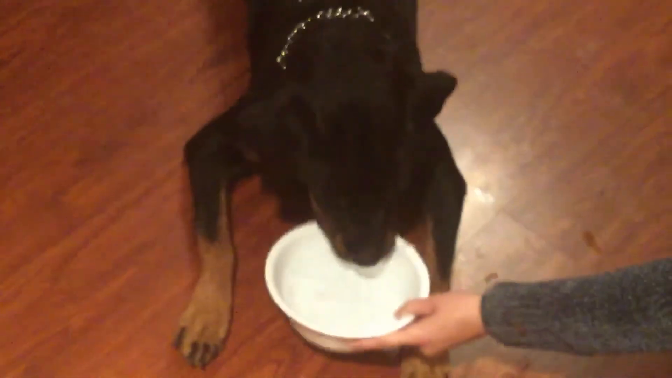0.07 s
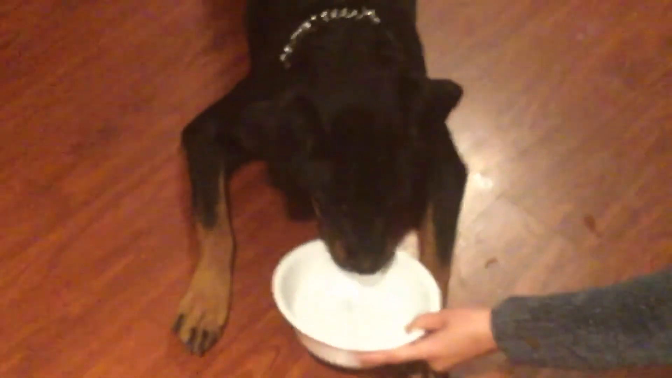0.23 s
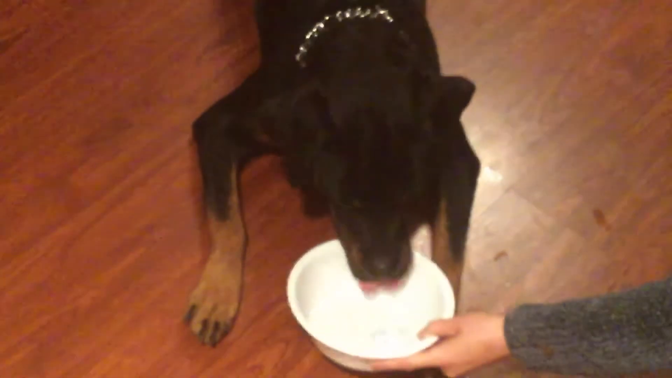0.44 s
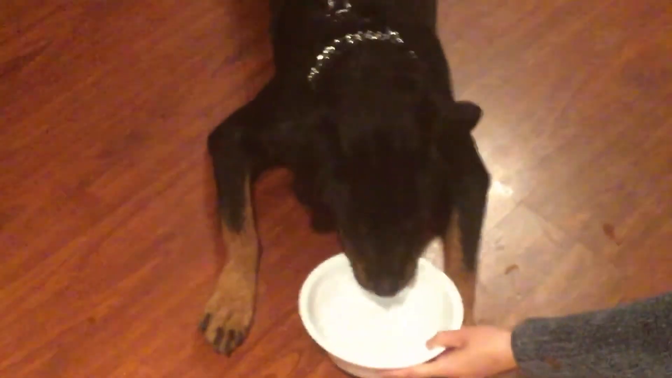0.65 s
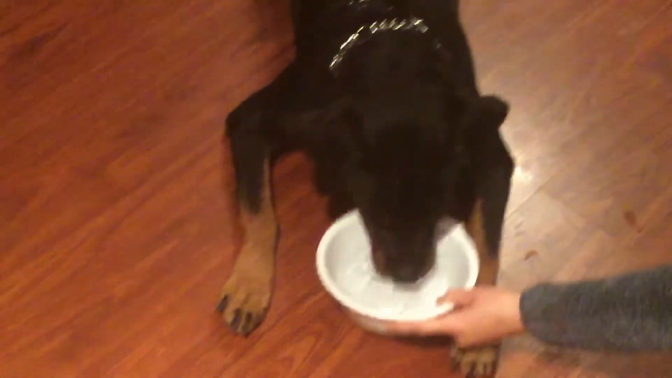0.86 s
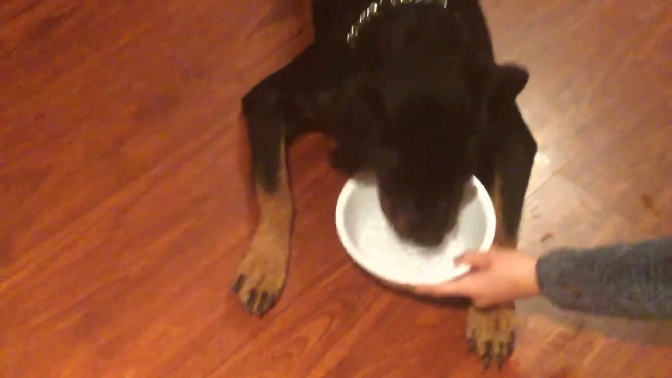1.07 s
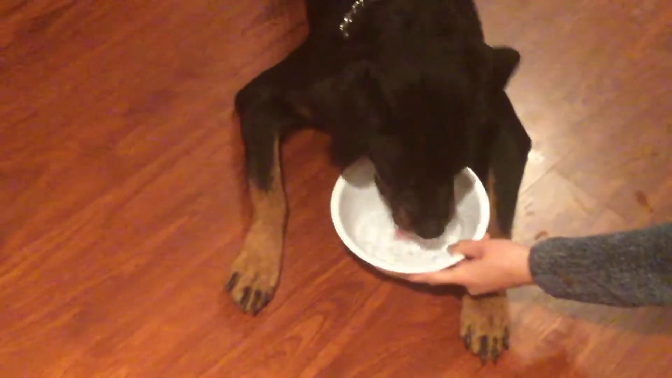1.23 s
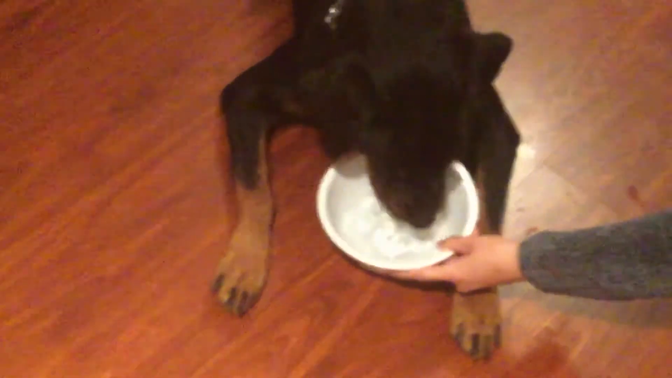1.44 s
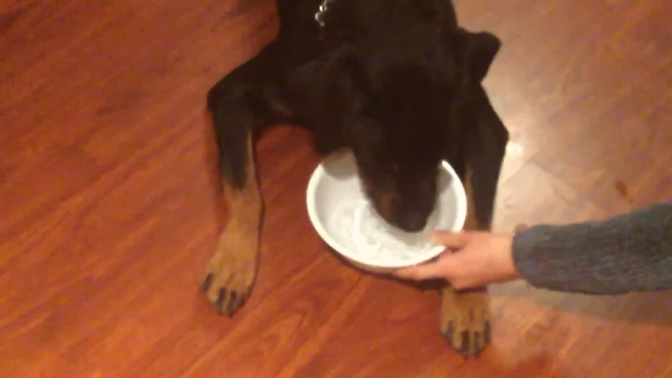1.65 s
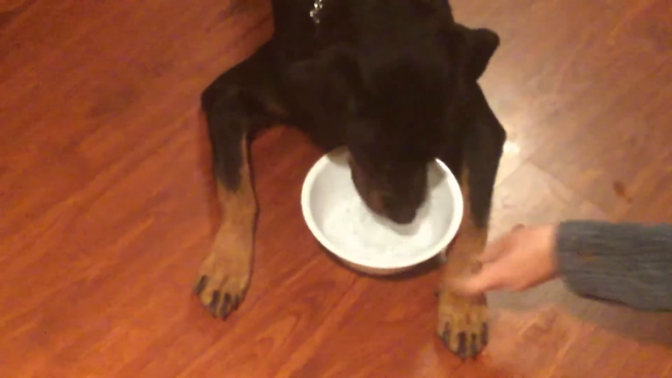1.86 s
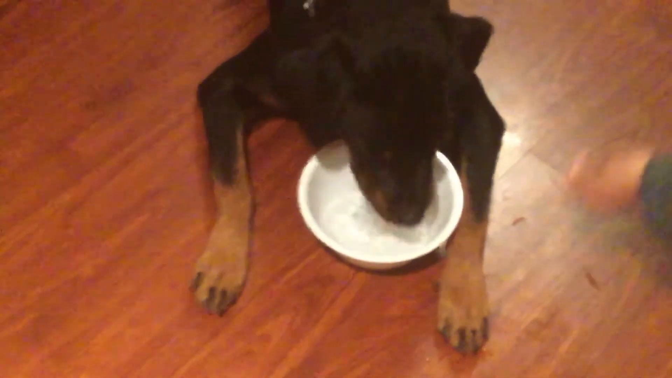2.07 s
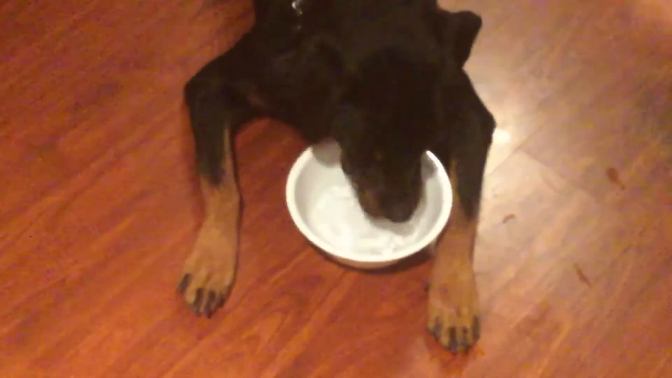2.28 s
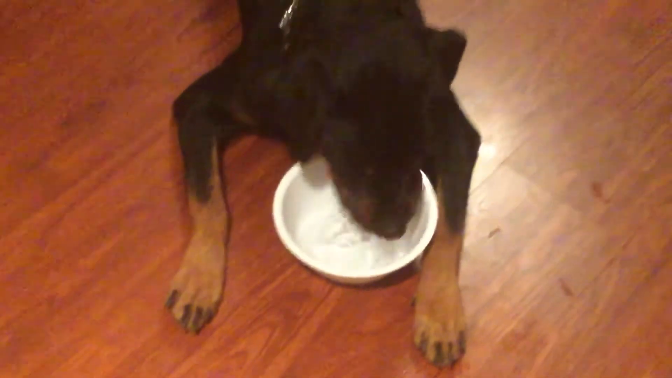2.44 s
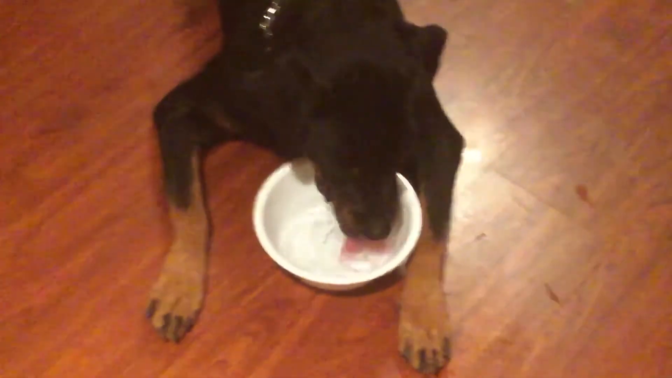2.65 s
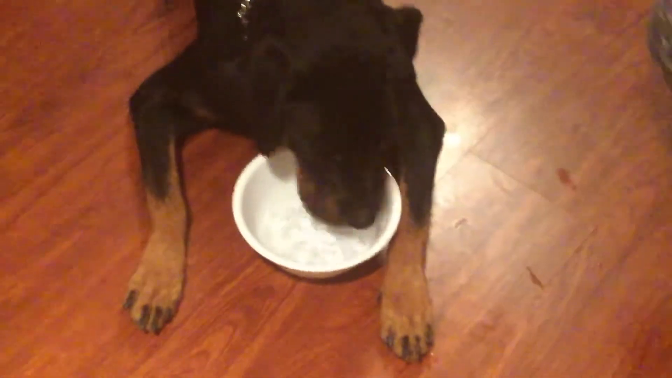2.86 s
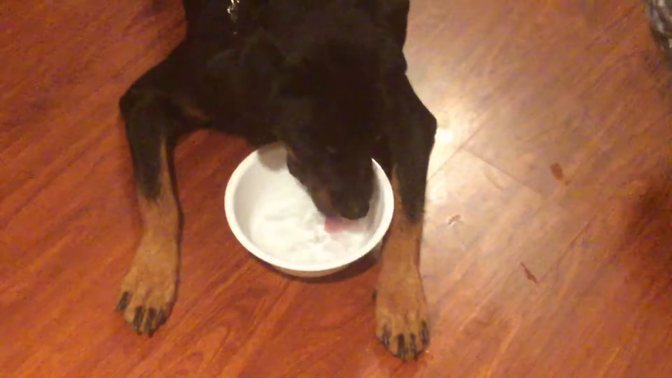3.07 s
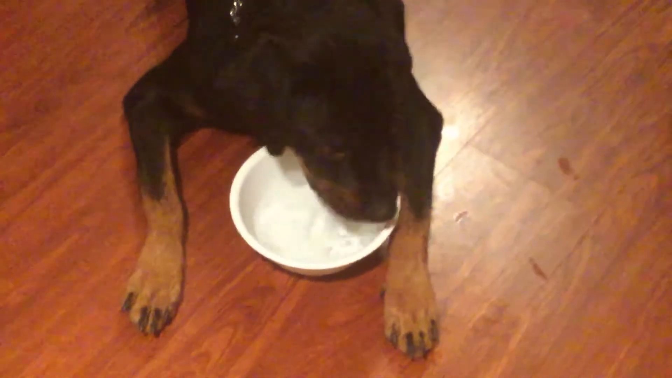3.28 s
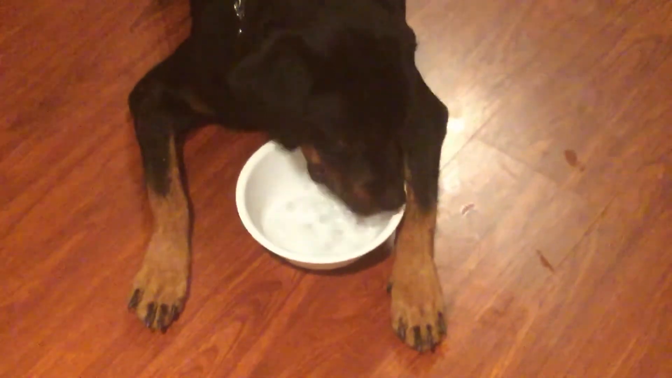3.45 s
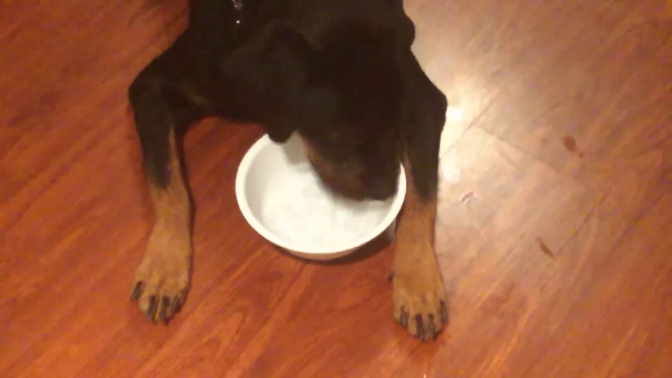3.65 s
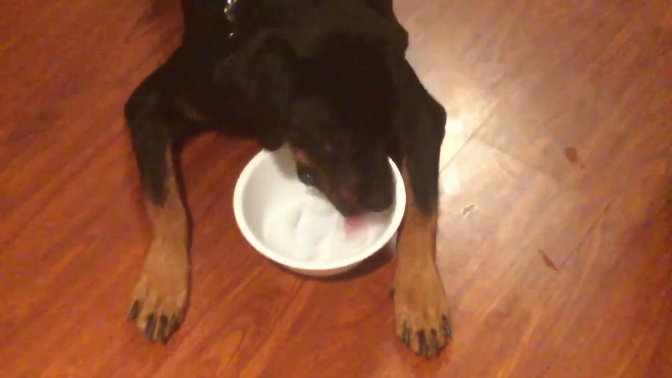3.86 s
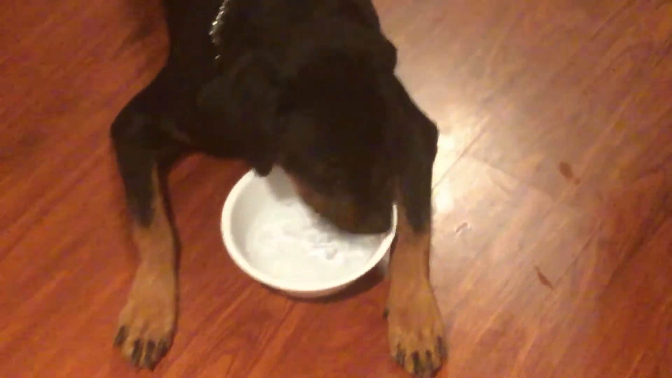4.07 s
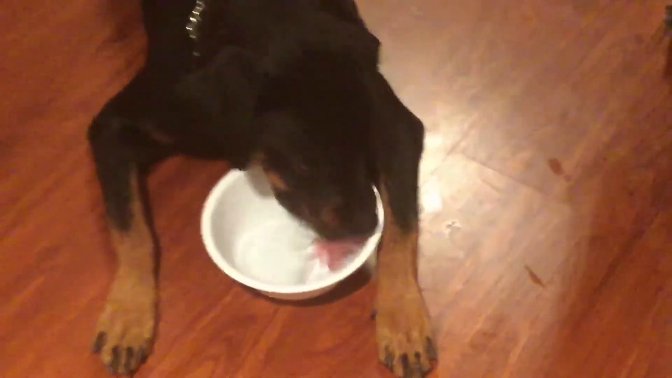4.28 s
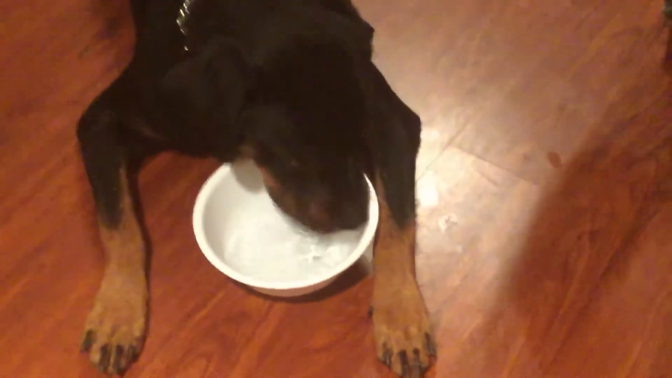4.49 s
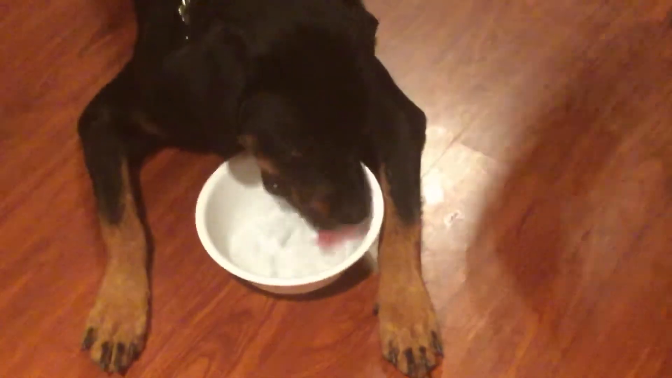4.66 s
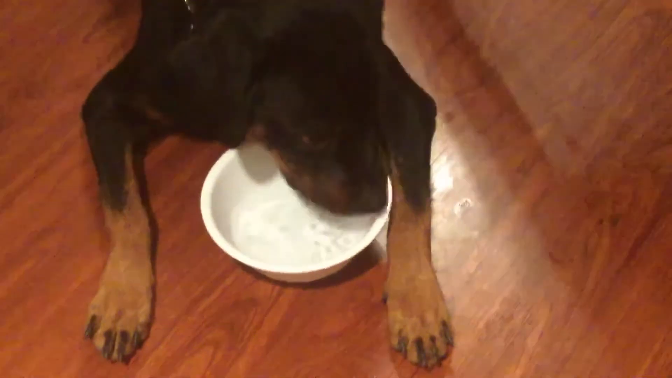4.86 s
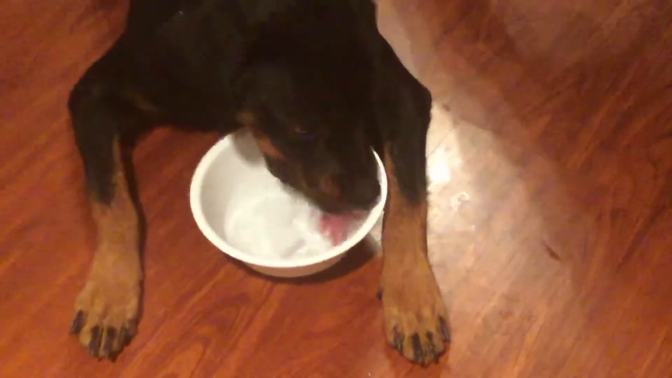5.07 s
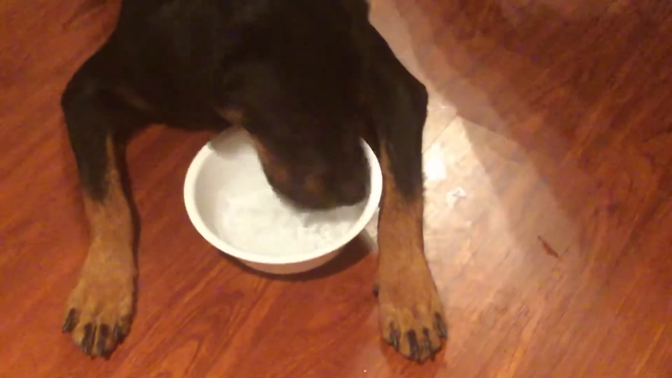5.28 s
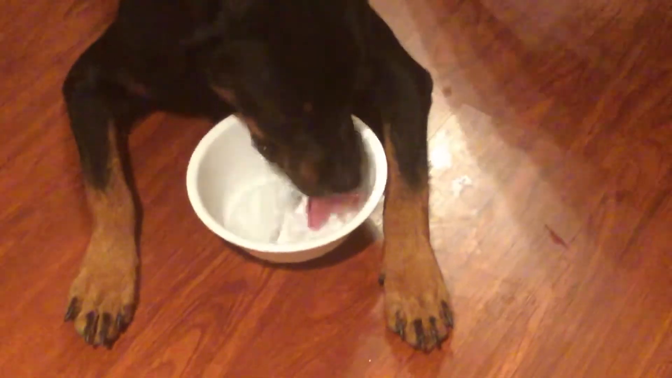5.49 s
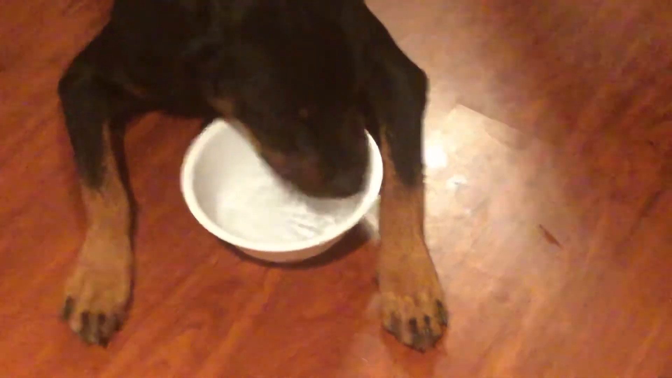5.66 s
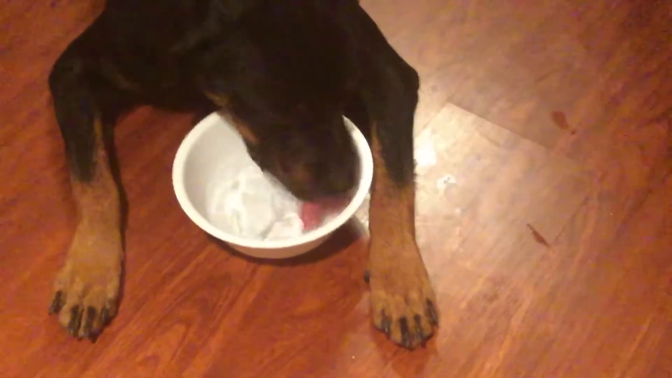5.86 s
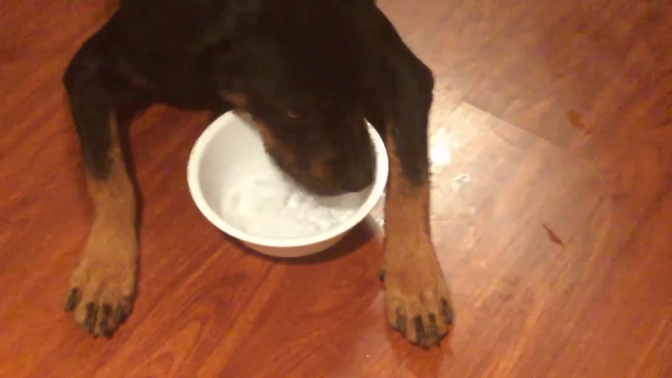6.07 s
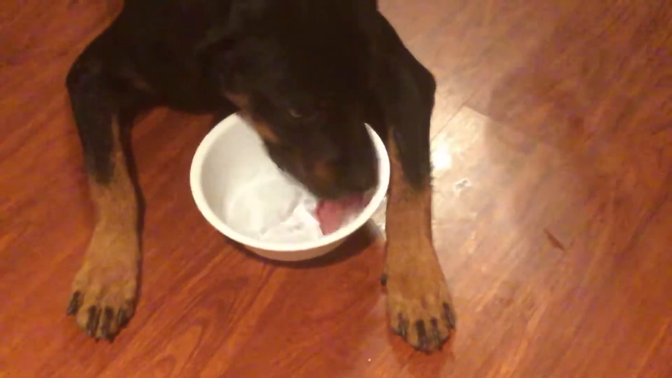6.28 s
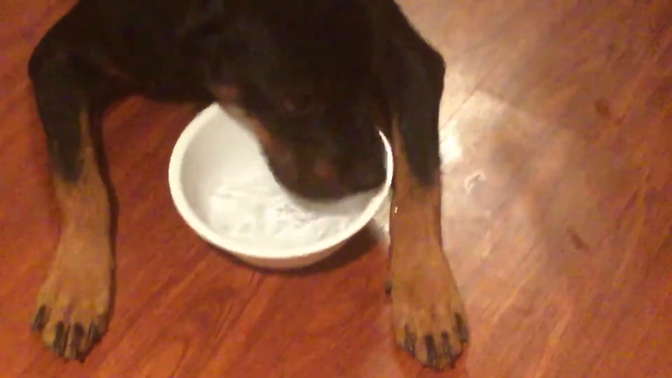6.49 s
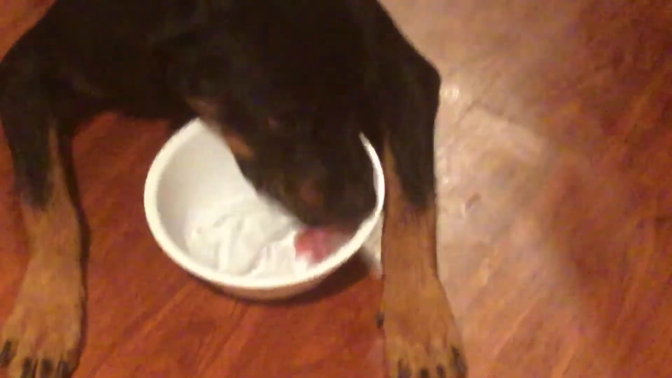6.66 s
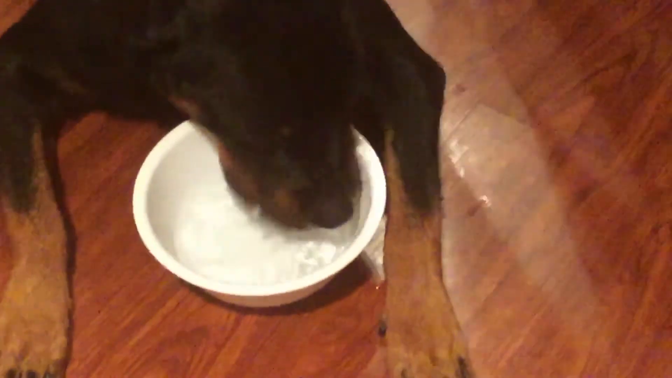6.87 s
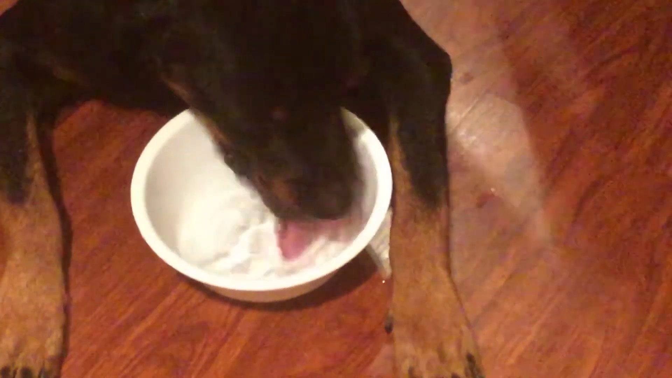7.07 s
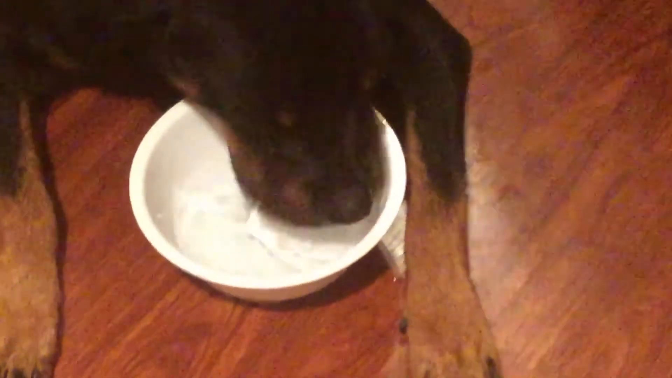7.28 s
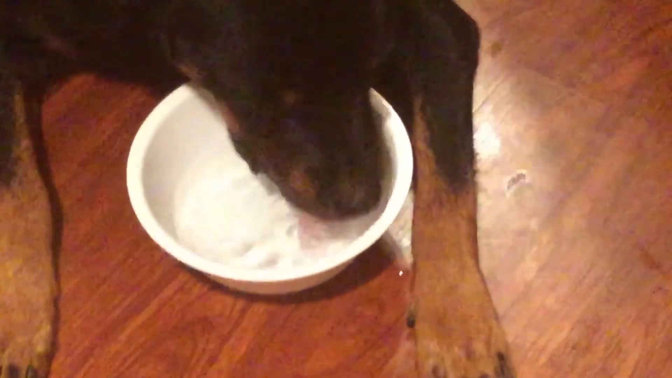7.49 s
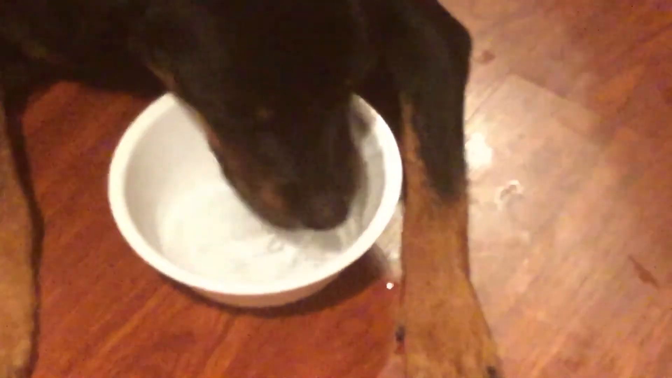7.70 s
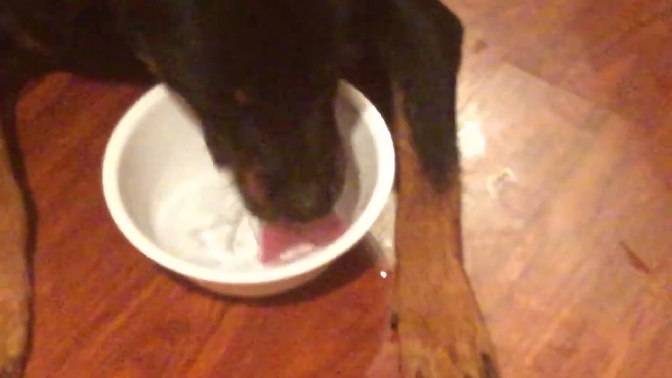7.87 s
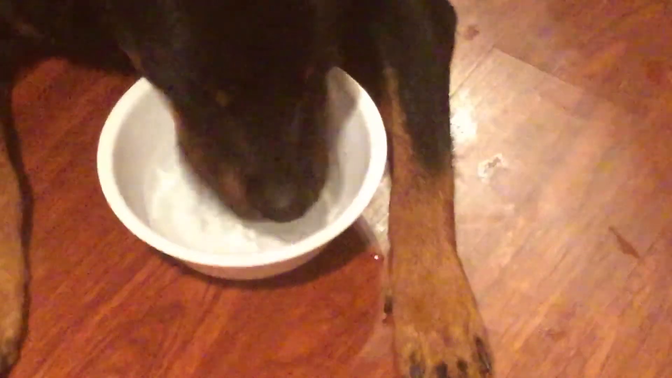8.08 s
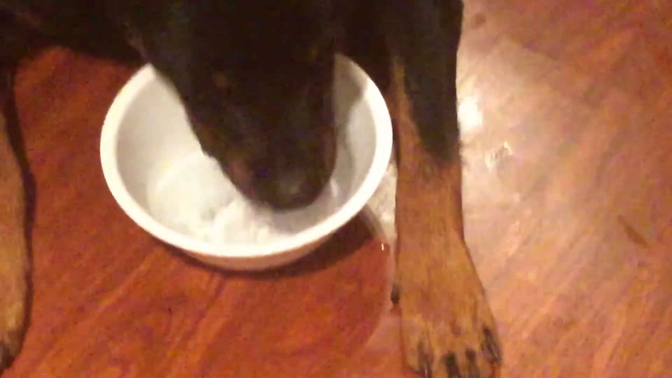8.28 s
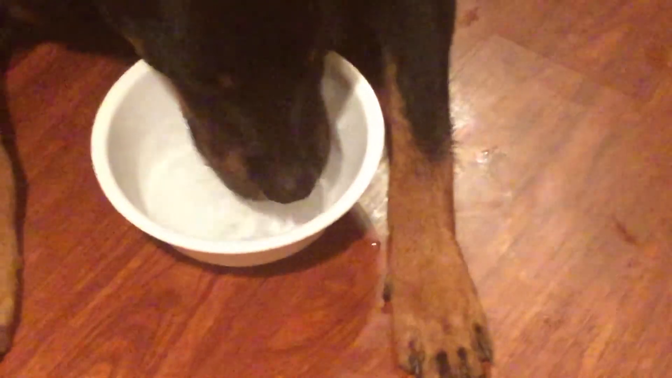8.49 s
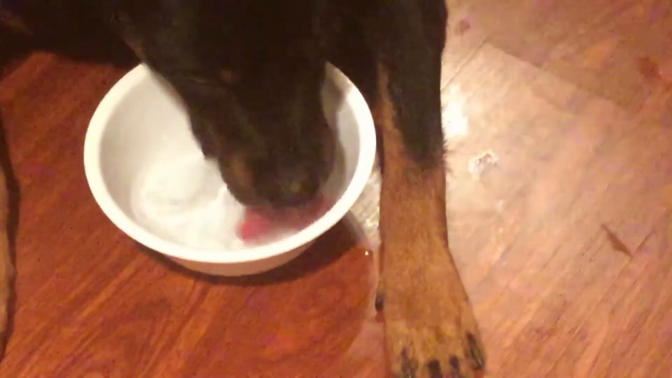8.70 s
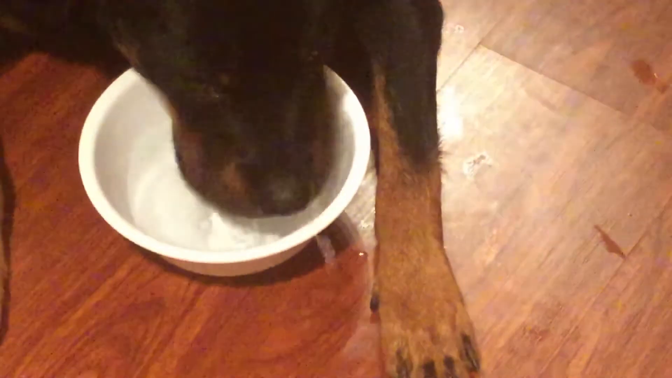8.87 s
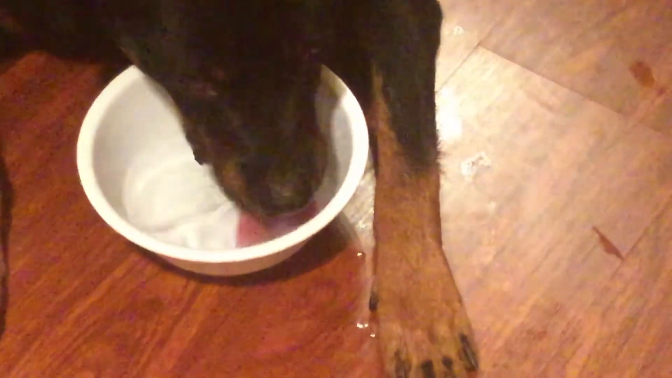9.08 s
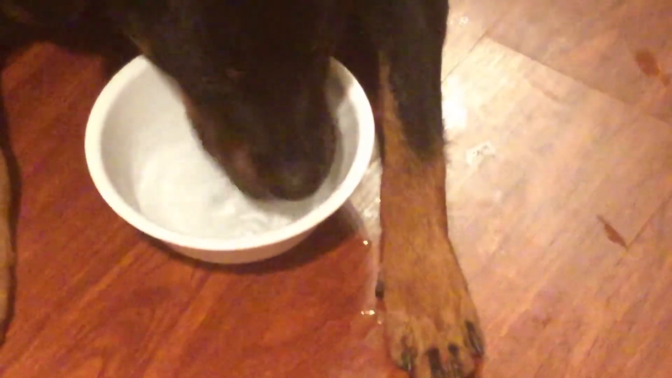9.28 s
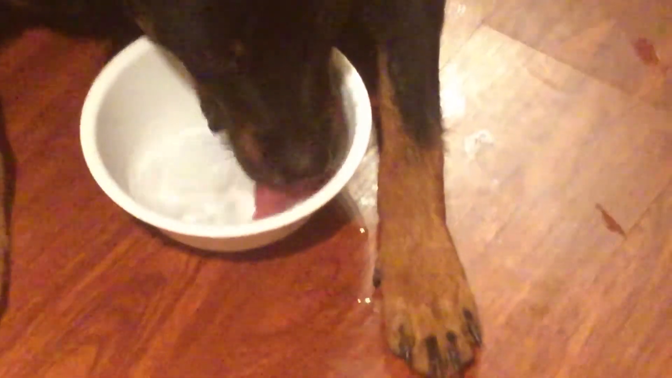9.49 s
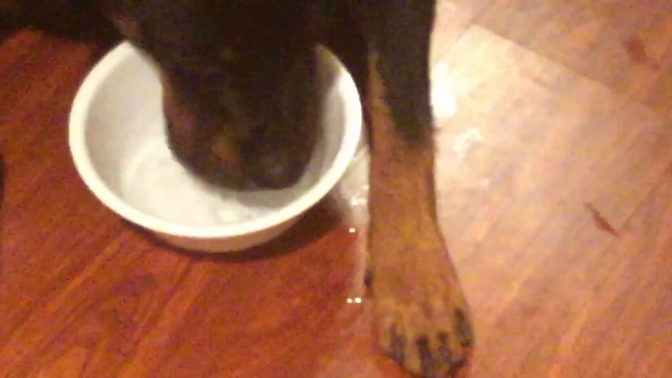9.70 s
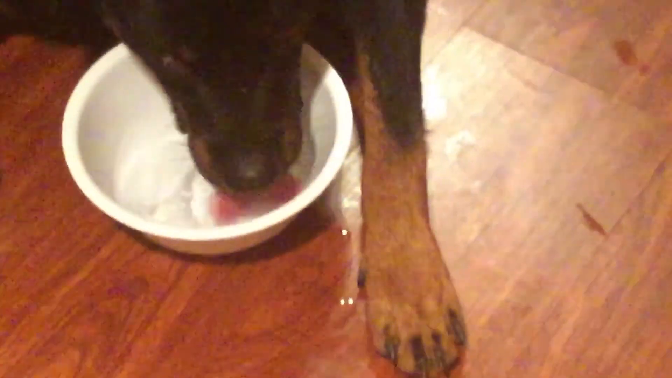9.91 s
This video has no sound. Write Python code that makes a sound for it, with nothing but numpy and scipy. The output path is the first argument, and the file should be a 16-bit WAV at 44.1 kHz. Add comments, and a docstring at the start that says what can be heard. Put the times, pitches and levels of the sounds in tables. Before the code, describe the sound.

Two hollow bowl knocks on floorboards, then a dog's quick, rhythmic wet licking and gulping, with a single brief jingle of a chain collar.

```python
"""In a small live room with a wooden floor, a dog close by laps from a bowl, about two and a half licks a second.
The bowl is set down with two knocks, rim and boards ringing; once the chain collar slips and jingles.
In each lick the tongue slaps in and stirs up slosh and spray; the jaws close with a smack and a gulp.
Water is made of swelling bubbles and coloured noise, rung by the hollow of the bowl and answered by the walls.
A faint mains hum, a low drone and room rumble lie underneath."""
import sys
import numpy as np
from scipy import signal
from scipy.fft import rfft, irfft, next_fast_len
from scipy.io import wavfile
from scipy.ndimage import map_coordinates

SR = 44100
rng = np.random.default_rng(int(sys.argv[2]) if len(sys.argv) > 2 else 0)


def unload_audio(sound):
    """Save the sound as a 16-bit wav file, at the path given as the first command line argument."""
    columns = np.transpose(np.atleast_2d(sound))
    # keep every value between -1 and 1, then stretch to whole-number steps
    steps = np.round(np.clip(columns, -1, 1) * 32767)
    wavfile.write(sys.argv[1], SR, steps.astype(np.int16))


N = 438354

# levels in the tables are mixing levels, ahead of the trims in the functions and of the microphone
# tone of sloshing water: freq_hz, level_db
SLOSH_TONE = [(200, -62.5), (350, -9.5), (520, -0.5), (800, -2), (1600, 5.5), (3000, -4.5), (5000, -7.5),
              (9000, -19)]
# the bowl meets the floor: start_s, thud_db, clack_db (of the rim)
FLOOR_KNOCKS = [(.663, -19, -19), (0.696, -25, -36), (.74, -39.5, -38), (0.788, -39, -43), (.822, -44, -62),
                (1.277, -19, -19), (1.313, -22, -61), (1.346, -61, -63), (1.49, -31, -44.5)]
# one lick each: dip_s (tongue dips), close_s (jaws close), slap_hz, slosh_db, spray_db,
# slap_db (of the dip), smack_db (of the jaws), pocket_hz (air pocket in the jaws), gulp_db
LICKS = [(.41, 0.491, 860, -62.5, -87, -66, -45.5, 773, -67),
         (0.92, 1.081, 1940, -64, -70.5, -43.5, -39.5, 1435, -59),
         (1.377, 1.499, 1200, -67, -89, -52, -64, 1410, -60),
         (1.628, 1.752, 3150, -65, -66, -41.5, -38.5, 890, -47),
         (2.006, 2.188, 706, -62.5, -66.5, -45.5, -35, 2315, -45.5),
         (2.351, 2.495, 1320, -59.5, -63, -45, -27.5, 1145, -47),
         (2.647, 2.828, 1320, -62, -65, -42, -41, 883, -49),
         (3.124, 3.324, 1130, -55.5, -68, -48.5, -38, 826, -47),
         (3.517, 3.655, 2150, -55.5, -68, -44, -37, 1450, -43.5),
         (3.923, 4.104, 690, -53.5, -63, -40, -33.5, 1240, -47),
         (4.313, 4.46, 1460, -51, -62.5, -31.5, -40, 1630, -46),
         (4.672, 4.876, 1294, -60, -67.5, -44.5, -41.5, 2420, -38.5),
         (5.088, 5.258, 1450, -57.5, -69, -53, -27.5, 1250, -42),
         (5.534, 5.699, 1050, -59, -67.5, -53, -34, 2850, -49),
         (5.89, 6.025, 1090, -62.5, -65, -41, -39, 813, -35.5),
         (6.323, 6.48, 1240, -56, -68, -41, -40.5, 1240, -62),
         (6.68, 6.829, 980, -64, -64, -41, -36.5, 1430, -42),
         (7.118, 7.272, 1420, -64, -67, -44, -33, 2500, -48),
         (7.458, 7.608, 1430, -60.5, -62.5, -39.5, -30, 1084, -37),
         (7.866, 8.053, 734, -54, -68.5, -39.5, -40.5, 1570, -45),
         (8.245, 8.392, 1510, -62.5, -69.5, -47, -35.5, 870, -40),
         (8.625, 8.858, 1270, -62.5, -69.5, -51, -47.5, 2160, -49.5),
         (9.031, 9.223, 1170, -60, -67.5, -52.5, -36.5, 793, -38.5),
         (9.516, 9.693, 1190, -64, -68.5, -63, -45.5, 880, -44)]

TOP_HZ = 15200  # upper limit of the microphone's band
GLIDE = .004  # share by which a bubble's pitch rises per swell time
GULP_HZ = 347.5
PEEL_SAMPLES = SR // 40  # wet surfaces part for this long before they let go


def amp(db):
    """Decibels to gain."""
    return 10 ** (np.asarray(db) / 20)


def unit(x):
    """Scaled to rms 1."""
    return x / np.sqrt(np.mean(x ** 2) + 1e-20)


def crest(x):
    """Scaled to peak 1."""
    return x / (np.abs(x).max() + 1e-20)


def along(points, hz):
    """(Hz, value) points read on a log frequency axis."""
    f, v = np.transpose(points)
    return np.interp(np.log(hz + 1), np.log(f + 1), v)


def curves(rows):
    """One value per sample for each column after the time."""
    s, *cols = np.transpose(rows)
    return [np.interp(np.arange(N) / SR, s, c) for c in cols]


def colour(x, spectrum):
    """x filtered by the given spectrum, at rms 1."""
    m = next_fast_len(len(x) + SR // 8)
    gain = amp(along(spectrum, np.fft.rfftfreq(m, 1 / SR)))
    return unit(irfft(rfft(x, m) * gain, m)[:len(x)])


def fade(t, t60):
    """Exponential decay by 60 dB in t60 seconds."""
    return np.exp(-np.log(1000) * t / t60)


def swell(age, attack, hold, t60):
    """An envelope that rises from age 0 and, once the hold is over, dies away."""
    return (1 - np.exp(-np.maximum(age, 0) / attack)) * fade(np.maximum(age - hold, 0), t60)


def add(track, s, sound):
    """Mix a sound in at time s."""
    i = max(round(s * SR), 0)
    part = track[i:i + len(sound)]
    part += sound[:len(part)]


def puff(spectrum, t, t60):
    """A brief burst of coloured noise."""
    return colour(rng.standard_normal(len(t)), spectrum) * fade(t, t60)


def ring(modes, t, scatter_db):
    """Struck modes, each a decaying sine, at new strengths and signs for each blow."""
    out = np.zeros(len(t))
    for hz, db, t60 in modes:
        strength = amp(db + scatter_db * rng.standard_normal()) * rng.choice([-1, 1])
        out += strength * fade(t, t60) * np.sin(2 * np.pi * hz * t)
    return out


def bubble(t, hz, life, rise):
    """An air pocket swells and dies as its pitch glides; life (s) holds at 1 kHz, smaller pockets are briefer."""
    swell_s = life * np.sqrt(1000 / hz)
    age = np.maximum(t, 0) / swell_s
    cycles = hz * swell_s * (age + rise * (age ** 2 / 2 - age))
    return np.sin(2 * np.pi * cycles) * age * np.exp(1 - age)


def burst(hz, life, rise, spread, span, later_db, count):
    """One pocket opens, then others of other sizes within span seconds; peak 1."""
    t = np.arange(SR // 20) / SR
    follows = (np.arange(count) > 0)[:, None]
    size, strength, length = rng.uniform(-1.5, 1.5, (3, count, 1))
    delay = follows * span * rng.random((count, 1))
    pitch = np.minimum(hz * np.exp(follows * spread * size), TOP_HZ)
    pockets = bubble(t - delay, pitch, life * np.exp(0.15 * length), rise)
    gains = amp(follows * (later_db + 2 * strength))
    return crest(np.sum(gains * pockets, axis=0))


def fizz(rate, low_hz, high_hz, life, scatter_db):
    """A steady swarm of small bubbles of random size, rate per second, from dry ticks to short blips."""
    when, size, luck, length = rng.random((int(rate * N / SR), 4)).T[:, :, None]
    hz = low_hz * (high_hz / low_hz) ** size
    k = np.arange(int(7 * SR * life * np.sqrt(1000 / low_hz)))
    strength = amp(-scatter_db * np.log(np.maximum(luck, .02)))  # a few are far louder
    grains = strength * bubble(k / SR, hz, life * (0.74 + length), GLIDE)
    places = (when * N).astype(int) + k
    return np.bincount(places.ravel(), grains.ravel(), N)[:N]


def background():
    """Steady sines hum, a narrow noise band drones, and broad noise makes the room's rumble and faint hiss."""
    # mains hum: freq_hz, level_db
    hum_tones = [(59.2, -66.5), (118.4, -67), (236.9, -68)]
    # tone of the room's air: freq_hz, level_db
    air_tone = [(15, -29.5), (25, -11.5), (66, 3), (112, 0.5), (181, 1.5), (237, -2.5), (354, -6.5),
                (515, -19), (900, -21.5), (1500, -27), (1760, -25), (7480, -36.5), (11500, -34),
                (13500, -38.5), (15000, -62)]
    # level of the room rumble over time: time_s, level_db
    rumble_level = [(0, -63.5), (3.4, -57.5), (5.2, -61), (9.94, -58)]
    # level of a low drone somewhere in the house: time_s, level_db
    drone_level = [(0, -96), (2, -75.5), (6.8, -59.5), (9.94, -62.5)]
    drone_tone = [(60, -30), (78, -24), (88, -15.0), (110, -27.5), (200, -87)]  # (Hz, dB)
    t = np.arange(N) / SR
    hum = sum(amp(db + 1.5) * np.sin(2 * np.pi * (hz * t + rng.random())) for hz, db in hum_tones)
    drone = amp(curves(drone_level)[0] + 0.5) * colour(rng.standard_normal(N), drone_tone)
    rumble = amp(curves(rumble_level)[0]) * colour(rng.standard_normal(N), air_tone)
    return hum + drone + rumble


def steps():
    """Soft weight on the floor makes it boom briefly at one pitch."""
    # from the full bowl and from footfalls: start_s, level_db, pitch_hz
    floor_booms = [(0.666, -36, 85), (3.401, -39, 102), (3.434, -38.5, 53.6), (4.49, -49, 71)]
    out, t = np.zeros(N), np.arange(SR // 2) / SR
    for s, db, hz in floor_booms:
        add(out, s, amp(db) * bubble(t, hz, life=0.003, rise=0))
    return out


def collar(count=120):
    """A hard first clink, then the chain runs link over link, each link ringing at its own high pitch."""
    # the collar's links strike: start_s, level_db
    clinks = [(4.271, -14)]
    # tone of the rattling links: freq_hz, level_db
    chain_tone = [(200, -10.5), (400, -12.5), (1200, -10), (2700, -18), (4400, -8), (6200, -10),
                  (8500, -2.5), (12000, -2.5), (13500, -10.5), (15000, -55)]
    out, t = np.zeros(N), np.arange(SR // 2) / SR
    links = [(hz, 0, .2) for hz in rng.uniform(6900, 14000, count)]  # (Hz, dB, t60 s)
    for s, db in clinks:
        contacts = rng.standard_normal(len(t)) * amp(4.3 * rng.standard_normal(len(t)))
        ringing = .5 * crest(ring(links, t, scatter_db=2))
        rattle = colour(contacts, chain_tone) * (fade(t, 0.0098) + 0.64 * fade(t, 0.3))
        add(out, s, amp(db - 13) * (rattle + ringing))
    return out


def bowl():
    """The rim clacks and chatters; the weight of the water follows and thuds on the boards."""
    # bowl on floorboards: freq_hz, level_db, t60_s
    board_modes = [(155, -0.5, 0.18), (220, 0.5, 0.041), (291, 0.5, 0.12), (380, 1.5, 0.061),
                   (433, -9, 0.12)]
    # the ringing rim: freq_hz, level_db, t60_s
    rim_modes = [(793, 0, 0.071), (1004, 10.5, 0.014), (1120, 15, 0.0098), (1420, -4.5, 0.032),
                 (1925, -6, .07), (2540, 3, 0.06), (3180, -15, 0.066)]
    # noise of the thud: freq_hz, level_db
    thud_tone = [(35, -33), (70, -11), (110, -10.5), (170, 12), (300, 8), (420, -3), (600, -21),
                 (1500, -45.5)]
    # noise of the rim's clack: freq_hz, level_db
    clack_tone = [(300, 0), (1200, 13.5), (2000, -4.5), (2600, -3), (4000, -8.5), (6000, -24), (13000, -38)]
    weight_lag_s = 0.00306
    out, t = np.zeros(N), np.arange(SR // 2) / SR
    for s, thud_db, clack_db in FLOOR_KNOCKS:
        crack = puff(clack_tone, t, t60=0.026) + 0.18 * puff(clack_tone, t, t60=0.19)
        clack = crest(0.41 * ring(rim_modes, t, scatter_db=4) + 3.2 * crack)
        thud = crest(ring(board_modes, t, scatter_db=1.0) + 2.25 * puff(thud_tone, t, t60=0.045))
        add(out, s, amp(clack_db) * clack)
        add(out, s + weight_lag_s, amp(thud_db) * thud)
    return out


def drop(hz):
    """A drop traps a bubble that sings for a few milliseconds."""
    return burst(hz, life=0.0013, rise=GLIDE, spread=.249, span=.0049, later_db=-6.0, count=4)


def drops(count=4):
    """Single clear drops, and with each lick small showers from the lips, the lifted tongue and the muzzle."""
    # the clearest drops falling back into the bowl: start_s, level_db, pitch_hz
    clear_drops = [(0.515, -50, 5150), (0.942, -52.5, 4950), (1.385, -47.5, 3750), (1.71, -59, 9900),
                   (2.353, -42, 9600), (2.37, -43.5, 3460), (2.697, -52, 3680), (2.83, -38.5, 2640),
                   (3.213, -44, 3020), (3.657, -43, 8700), (5.101, -38, 6800), (5.252, -38, 7330),
                   (5.63, -40.5, 10700), (5.66, -47, 4140), (5.893, -43, 3260), (5.986, -42, 3360),
                   (6.352, -45, 10000), (6.394, -43.5, 6400), (6.768, -45.5, 2510), (6.789, -37.5, 11600),
                   (7.176, -44.5, 9450), (7.285, -46, 13000), (7.491, -51, 2430), (7.566, -44, 2840),
                   (8.272, -47, 10400), (8.382, -40.5, 9000), (8.401, -48.5, 11500), (8.789, -42.5, 11600),
                   (8.615, -48.5, 477), (8.798, -48, 3020), (8.813, -46, 3340), (9.049, -44, 12600),
                   (9.08, -53.5, 2040), (9.222, -37.5, 9140)]
    lips_db, lips_s = 5, .08  # the parting lips, re the spray
    shed_db, shed_hz = 14.5, 8900  # the lifted tongue, re the spray; the pitch serves the lips too
    drip_db, drip_hz, drip_s = 1, 1520, .2  # the muzzle, re the slosh
    out = np.zeros(N)
    for s, db, hz in clear_drops:
        add(out, s, amp(db + 1) * drop(hz))
    for dip, close, _, slosh_db, spray_db, *_ in LICKS:
        showers = [(dip - lips_s, lips_s, spray_db + lips_db, shed_hz),
                   (dip, close - dip, spray_db + shed_db, shed_hz),
                   (close, drip_s, slosh_db + drip_db, drip_hz)]
        for start, length, db, hz in showers:
            for k, (when, size, strength) in enumerate(rng.uniform(-1, 1, (count, 3))):
                s = start + length * (k + (1 + when) / 2) / count
                add(out, s, amp(db + 6 * strength) * drop(hz * np.exp(0.47 * size)))
    return out


def snaps():
    """A tearing film of water gives a sharp, bright tick."""
    # water films snapping on the lips: start_s, level_db
    film_snaps = [(.302, -41.5), (0.918, -48.5), (1.202, -49.5), (1.255, -43), (1.6145, -37), (1.7113, -32),
                  (2.3525, -36), (3.5154, -33), (3.925, -39), (4.0557, -28.5), (4.4725, -21.5),
                  (4.8429, -26.5), (5.0897, -35), (5.0985, -36), (6.4203, -32), (6.6582, -29),
                  (6.7536, -34), (7.599, -38), (9.666, -30.5)]
    # tone of a snap: freq_hz, level_db
    snap_tone = [(1000, -22), (2500, -2), (5000, -7), (8000, 4), (12000, 8), (15000, -12.5)]
    out, t = np.zeros(N), np.arange(SR // 20) / SR
    for s, db in film_snaps:
        tick = crest(puff(snap_tone, t, t60=.008))
        add(out, s, amp(db) * tick)
    return out


def peel(db):
    """The hiss of wet surfaces parting, swelling up to the moment they let go."""
    t = np.arange(PEEL_SAMPLES) / SR
    return amp(db - 12.5) * puff(SLOSH_TONE, t, t60=0.024)[::-1]


def smack(out_db, hz, life, later_db):
    """Surfaces peel apart, then an air pocket opens PEEL_SAMPLES after the start."""
    pocket = burst(hz, life=life, rise=GLIDE, spread=.42, span=.014, later_db=later_db, count=6)
    return np.concatenate([peel(out_db), amp(out_db - 1.0) * pocket])


def squish():
    """Water squeezed out: a puff of noise full of tiny beads."""
    # tone of the squeezed water: freq_hz, level_db
    squish_tone = [(300, -50), (1000, -30), (2500, 19.5), (4000, 4), (6000, 0), (9000, 8.5), (12000, 14),
                   (15000, -26)]
    t = np.arange(SR // 20) / SR
    beads = burst(4020, life=0.00039, rise=GLIDE, spread=0.675, span=0.02, later_db=-2.0, count=10)
    squeeze = puff(squish_tone, t, t60=0.014) * (1 - fade(t, 0.0078))  # softened onset
    return beads + 0.9 * squeeze


def pops():
    """A large bubble sings out, breaks into smaller ones and throws a little water."""
    # large bubbles that burst on their own: start_s, level_db, pitch_hz
    big_bubbles = [(1.029, -47, 1844), (1.066, -39, 1343), (1.41, -41.5, 4380), (1.432, -42, 1430),
                   (1.771, -39, 1390), (2.508, -27.5, 1625), (2.85, -35, 1490), (3.194, -38, 390),
                   (3.255, -41.5, 2190), (3.669, -41, 3980), (3.687, -34.5, 2440), (3.971, -42, 1750),
                   (4.053, -31, 4130), (4.378, -36, 2640), (4.444, -34.5, 6760), (4.844, -36.5, 2990),
                   (4.91, -37.5, 2190), (4.931, -44.5, 1750), (5.143, -41.5, 1510), (5.213, -28.5, 2470),
                   (5.265, -31.5, 1010), (6.477, -41.5, 800), (6.493, -40.5, 2840), (6.79, -38, 4220),
                   (6.819, -46, 2320), (7.206, -40.5, 3930), (7.263, -35.5, 1740), (7.619, -33, 1510),
                   (7.899, -36.5, 1600), (7.985, -34.5, 710), (8.039, -44, 1620), (8.059, -38.5, 2410),
                   (8.27, -39.5, 2460), (8.402, -42, 860), (8.869, -40, 1540), (9.234, -37, 2190),
                   (9.619, -35.5, 2070), (9.861, -41.5, 2100)]
    out = np.zeros(N)
    for s, db, hz in big_bubbles:
        add(out, s - PEEL_SAMPLES / SR, smack(db, hz, life=.0018, later_db=-12))
        plop = burst(GULP_HZ, life=0.0011, rise=2 * GLIDE, spread=0.26, span=0.018, later_db=4.5, count=3)
        add(out, s, amp(db - 3.5) * (amp(-12.5) * plop + amp(-5.5) * squish()))
    return out


def wash():
    """Slosh and spray build as the tongue dips, surge as the jaws close, then drain; knocks jolt the water."""
    attack_s, surge_s, surge_lag_s = 0.03, 0.016, 0.012
    slosh_surge_db, spray_surge_db = 8, 10
    slosh_t60_s, spray_t60_s = .33, .16
    rocking_db, rocking_t60_s = -11, 1.5  # water keeps rocking between licks, re the lick's slosh
    still_slosh_db, still_spray_db = -78, -86
    jolt_db, jolt_t60_s = -39, 0.41  # re the clack of the knock
    age = np.arange(SR) / SR
    slosh, spray = np.full(N, amp(still_slosh_db)), np.full(N, amp(still_spray_db))
    for dip, close, _, slosh_db, spray_db, *_ in LICKS:
        hold = close - dip
        surge = np.exp(-((age - hold - surge_lag_s) / surge_s) ** 2 / 2)
        rocking = amp(rocking_db) * swell(age, attack_s, hold, rocking_t60_s)
        slosh_shape = swell(age, attack_s, hold, slosh_t60_s) + rocking
        spray_shape = swell(age, attack_s, hold, spray_t60_s)
        add(slosh, dip, amp(slosh_db - 9.5 + slosh_surge_db * surge) * slosh_shape)
        add(spray, dip, amp(spray_db - 5 + spray_surge_db * surge) * spray_shape)
    for s, _, clack_db in FLOOR_KNOCKS:
        jolt = amp(clack_db + jolt_db) * swell(age, attack_s, 0.04, jolt_t60_s)
        add(slosh, s, jolt)
        add(spray, s, amp(-6) * jolt)
    return slosh, spray


def stirring():
    """The moving tongue keeps up a wash of water; bubbles and spray crowd in as it stirs harder."""
    # tone of the spray: freq_hz, level_db
    spray_tone = [(1500, 2), (4000, 13), (6000, -5.5), (9000, 11), (12000, 12.5), (15000, 4)]
    clumps_per_s, clump_db = 45, 3
    slosh_gain, spray_gain = wash()
    churn, spatter = np.clip([slosh_gain * amp(66), spray_gain * amp(46.5)], 0, 1)
    # a smooth random level makes the water come in clumps
    knots = np.arange(N) * clumps_per_s / SR
    wander = map_coordinates(rng.standard_normal(int(knots[-1]) + 4), [knots])
    clumps = unit(amp(clump_db * wander))
    bubbles = unit(fizz(rate=650, low_hz=400, high_hz=6000, life=.0016, scatter_db=4))
    mist = unit(fizz(rate=1800, low_hz=3500, high_hz=14000, life=.001, scatter_db=5.5))
    slosh = colour(churn * bubbles + .6 * rng.standard_normal(N), SLOSH_TONE)
    spray = colour(spatter * mist + .25 * rng.standard_normal(N), spray_tone)
    return clumps * (slosh_gain * slosh + amp(2.5) * spray_gain * spray)


def gurgles(count=22):
    """A dense chain of bubbles follows the tongue, falling in pitch and swelling as the hollow under it grows."""
    gurgle_db, gurgle_hz, fall_octaves = -14.5, 1710, 1.055  # level re the slosh
    out, t = np.zeros(N), np.arange(SR // 25) / SR
    for dip, close, _, slosh_db, *_ in LICKS:
        for k, (when, size, strength) in enumerate(rng.uniform(-0.987, 1, (count, 3))):
            u = (k + (1 + when) / 2) / count  # progress through the lick, 0 to 1
            hz = gurgle_hz * 2 ** (size / 2 - fall_octaves * u)
            blip = bubble(t, hz, life=.0022, rise=-GLIDE)
            level_db = slosh_db + gurgle_db + 10 * u + 7.7 * strength
            add(out, dip + (close - dip) * u, amp(level_db) * blip)
    return out


def licks():
    """The tongue slaps the water; the jaws close on an air pocket; both squish water out."""
    dip_squish_db, jaw_squish_db = -9.5, 25  # re the slap, re the spray
    out, lead = np.zeros(N), PEEL_SAMPLES / SR
    for dip, close, slap_hz, _, spray_db, slap_db, smack_db, pocket_hz, _ in LICKS:
        add(out, dip - lead, smack(slap_db, slap_hz, life=0.0013, later_db=0))
        add(out, dip, amp(slap_db + dip_squish_db) * squish())
        add(out, close - lead, smack(smack_db, pocket_hz, life=.0016, later_db=-5.5))
        add(out, close, amp(spray_db + jaw_squish_db) * squish())
    return out


def gulps():
    """The closing mouth plops twice on low air pockets, softly and then fully."""
    first_lead_s, first_db = .028, -10.5  # the softer gulp, re the main one
    out = np.zeros(N)
    for _, close, *_, db in LICKS:
        for s, level_db in [(close - first_lead_s, db + first_db), (close, db)]:
            plop = burst(GULP_HZ, life=.0023, rise=GLIDE, spread=.14, span=.011, later_db=-6, count=3)
            add(out, s, amp(level_db + 1) * plop)
    return out


def hollow(x, echo_db, reach, count=40, order=8):
    """Quick echoes off bowl wall, muzzle and floor, within about reach seconds; they shift as the head moves."""
    out = x.copy()
    for part in np.array_split(np.arange(N), count):
        delays = reach * (.08 + rng.random(order))
        for delay, sign in zip(delays, rng.choice([-1, 1], order)):
            add(out, part[0] / SR + delay, sign * amp(echo_db) * x[part])
    return out


def cavity(x):
    """The air between muzzle and bowl lends every water sound a short ring at one pitch."""
    pitch_hz, width_hz, ring_db = 801, 23.3, 4
    b, a = signal.iirpeak(pitch_hz, pitch_hz / width_hz, SR)
    return x + amp(ring_db) * signal.lfilter(b, a, x)


def room(x, gap, count=24):
    """The walls' answer, a decaying noise tail drawn anew slice by slice as head and bowl move."""
    # decay of the room: freq_hz, t60_s
    room_decay = [(150, 0.45), (400, 0.41), (1000, 0.32), (3000, 0.26), (8000, 0.15), (14000, 0.18)]
    out = np.zeros(N)
    for part in np.array_split(np.arange(N), count):
        hz, t, z = signal.stft(rng.standard_normal(SR // 2), SR, nperseg=256)
        decay = fade(t, along(room_decay, hz)[:, None])
        tail = signal.istft(z * decay, SR, nperseg=256)[1]
        add(out, part[0] / SR + gap, signal.fftconvolve(x[part], tail / np.linalg.norm(tail)))
    return out


def scene():
    """Dog and bowl close by, with the room around them; the gulps, inside the mouth, reach the walls less."""
    water = licks() + gurgles() + pops() + drops() + stirring()
    water = cavity(hollow(water, echo_db=-17, reach=.004))
    near = water + snaps() + bowl() + collar()
    mouth = gulps()
    walls = amp(-6.5) * room(near + amp(-3) * mouth, gap=0.0045)
    return (near + mouth + walls + steps() + background())[None]


def record(dry):
    """The microphone loses the deepest bass, dulls the highest treble and keeps nothing above its band limit."""
    response = [(20, -32.5), (45, -1.5), (12800, 1.0), (15000, -7.5)]  # (Hz, dB)
    m = next_fast_len(N + SR // 2)
    hz = np.fft.rfftfreq(m, 1 / SR)
    microphone = amp(along(response, hz)) * (hz < TOP_HZ)
    return irfft(rfft(dry, m) * microphone, m)[:, :N]


dry = scene()
out = record(dry)
unload_audio(out)
```